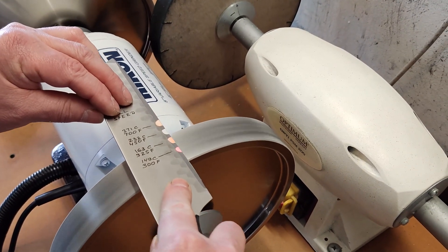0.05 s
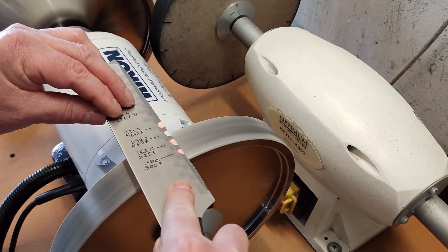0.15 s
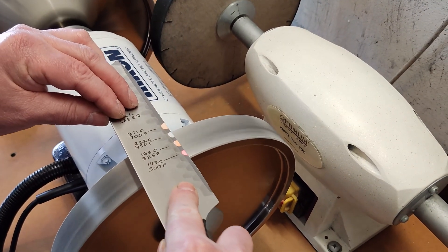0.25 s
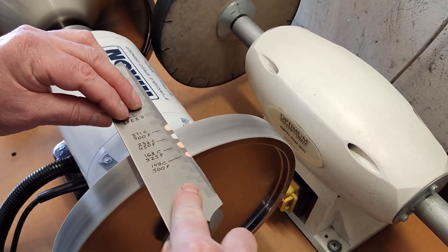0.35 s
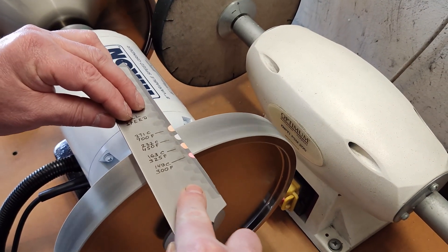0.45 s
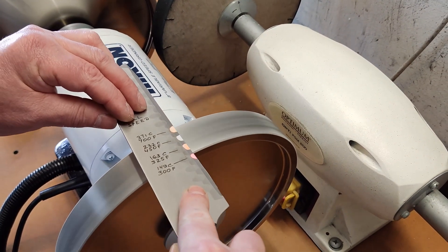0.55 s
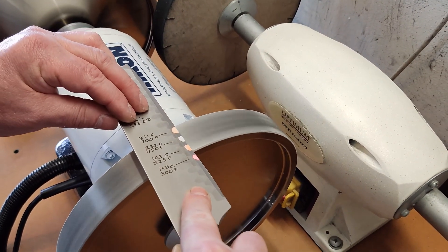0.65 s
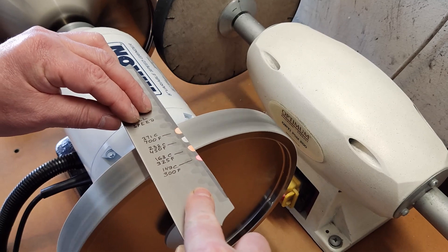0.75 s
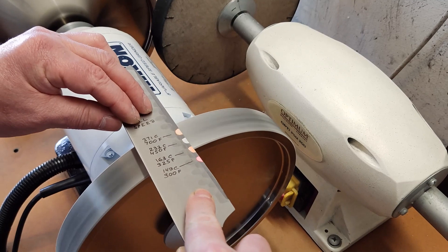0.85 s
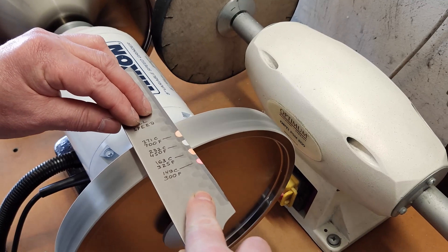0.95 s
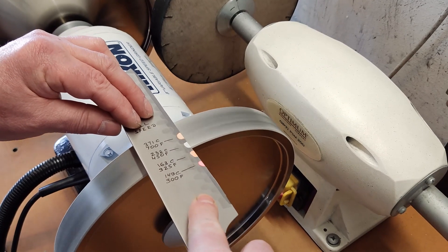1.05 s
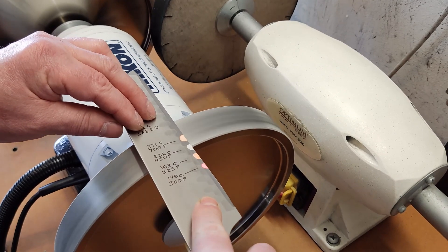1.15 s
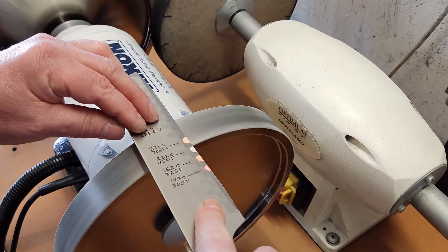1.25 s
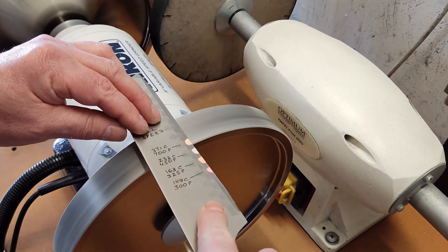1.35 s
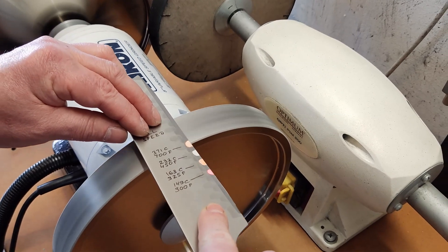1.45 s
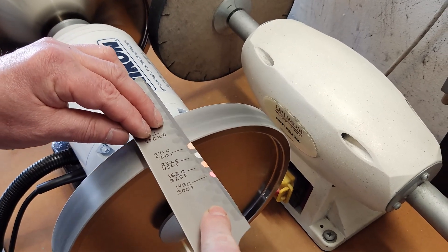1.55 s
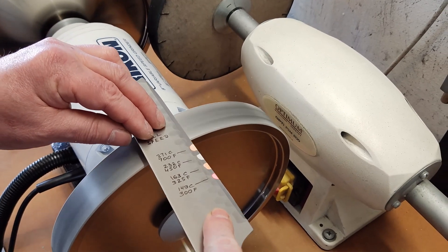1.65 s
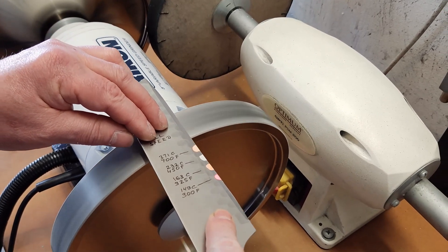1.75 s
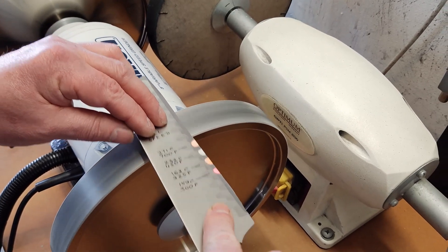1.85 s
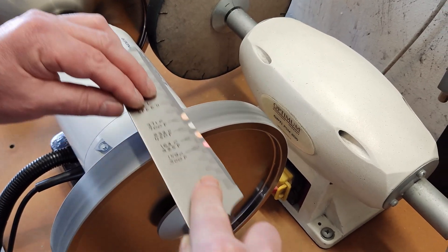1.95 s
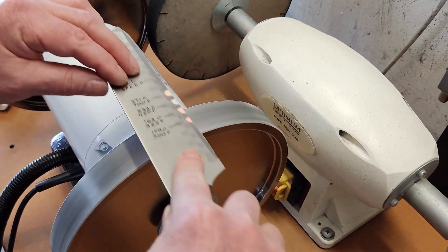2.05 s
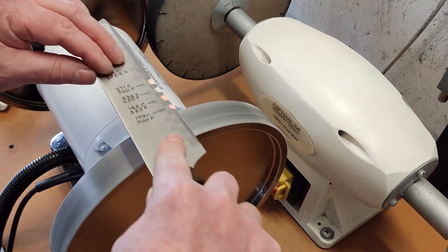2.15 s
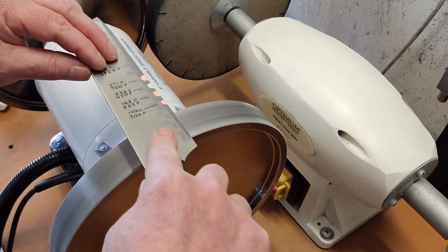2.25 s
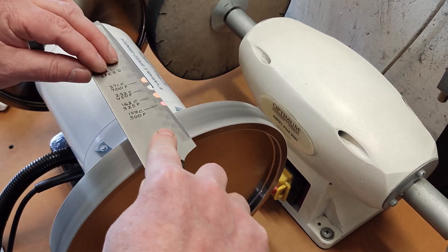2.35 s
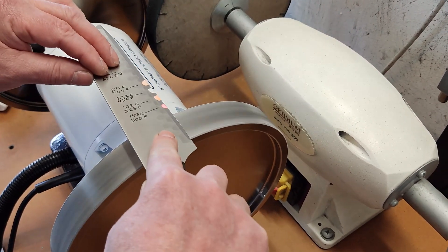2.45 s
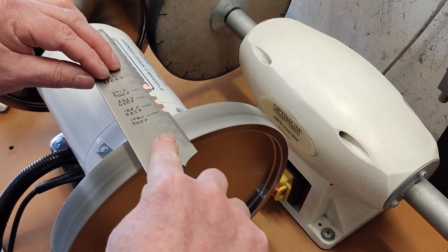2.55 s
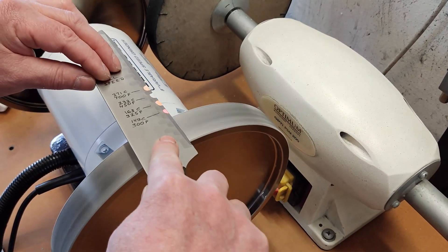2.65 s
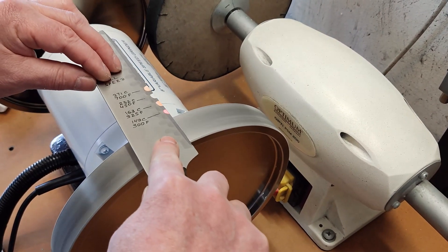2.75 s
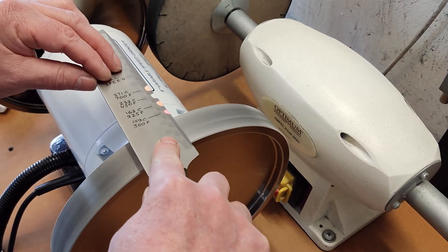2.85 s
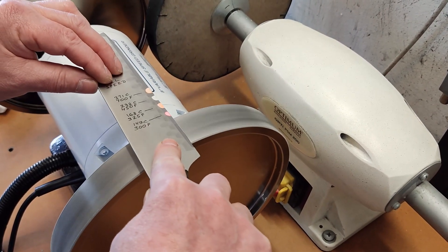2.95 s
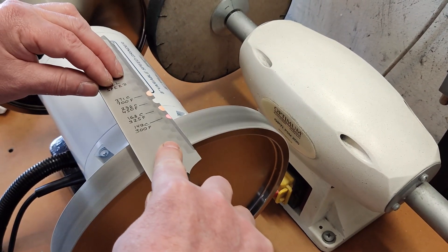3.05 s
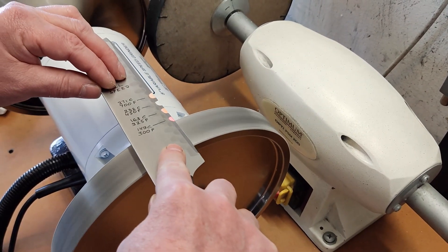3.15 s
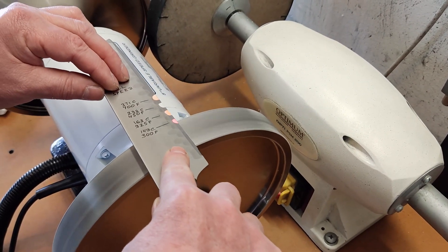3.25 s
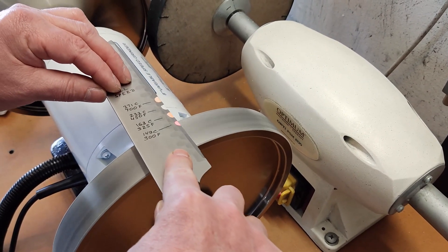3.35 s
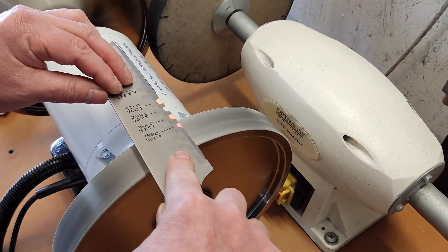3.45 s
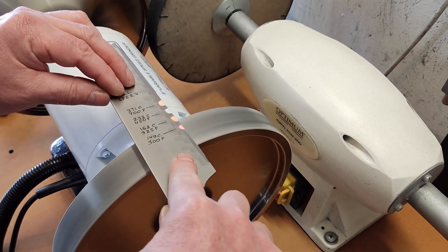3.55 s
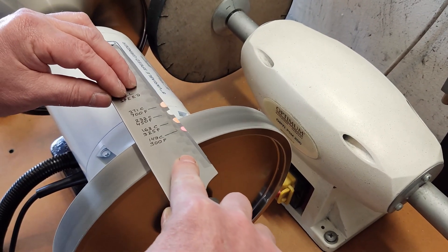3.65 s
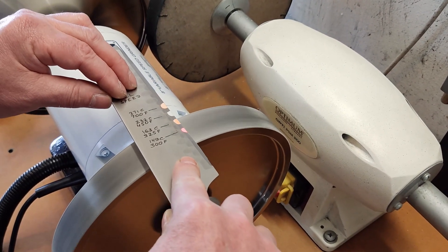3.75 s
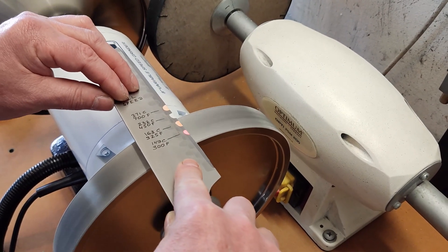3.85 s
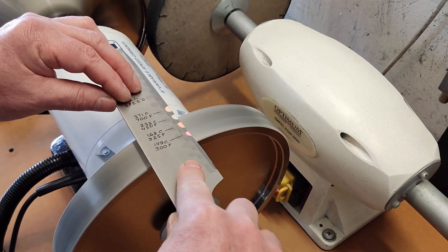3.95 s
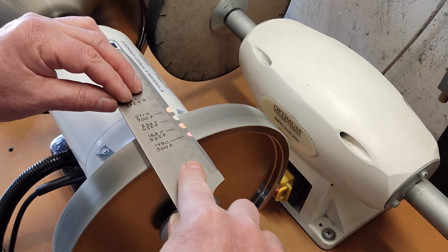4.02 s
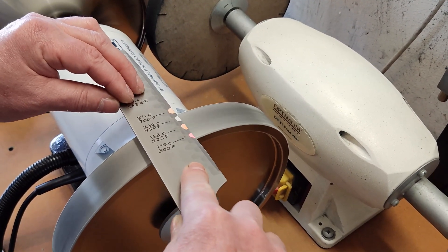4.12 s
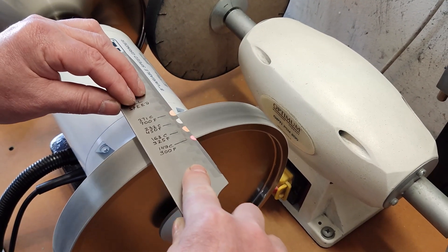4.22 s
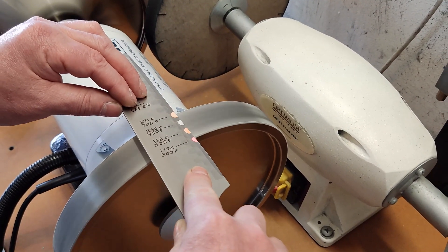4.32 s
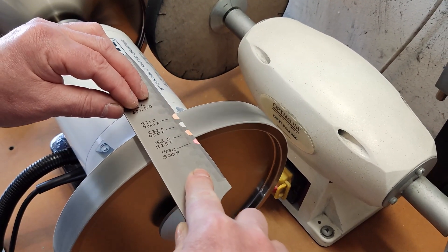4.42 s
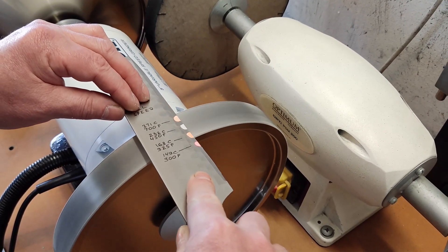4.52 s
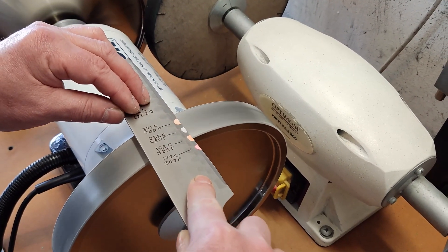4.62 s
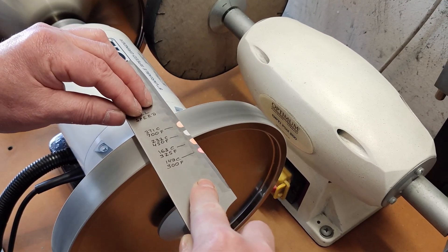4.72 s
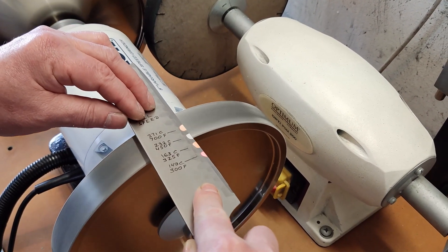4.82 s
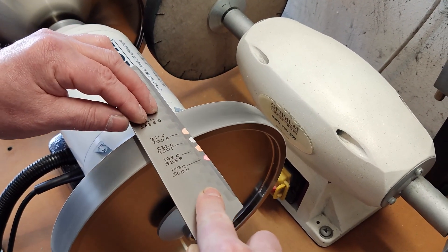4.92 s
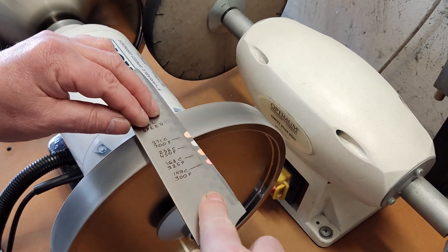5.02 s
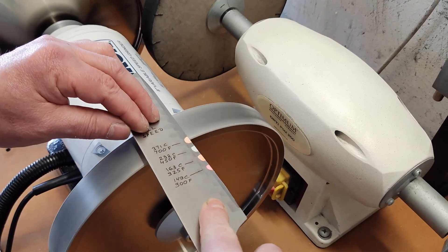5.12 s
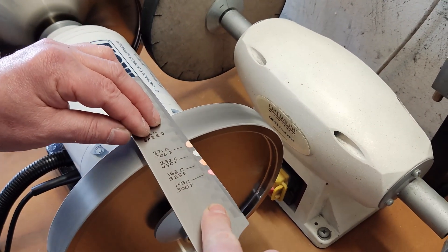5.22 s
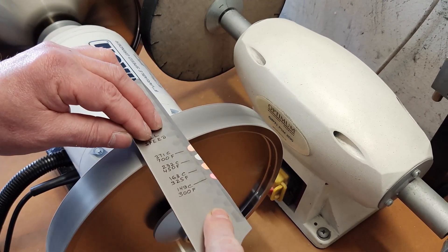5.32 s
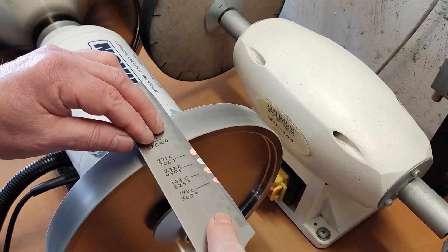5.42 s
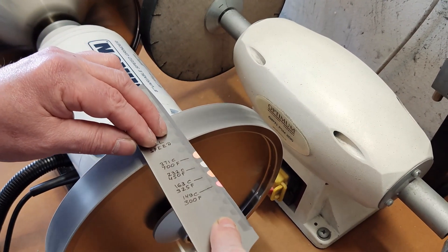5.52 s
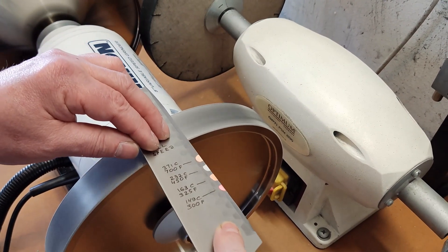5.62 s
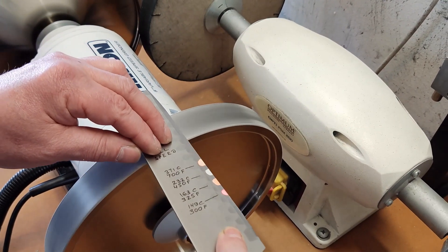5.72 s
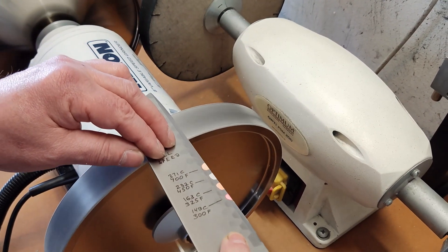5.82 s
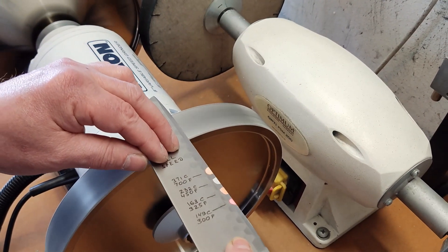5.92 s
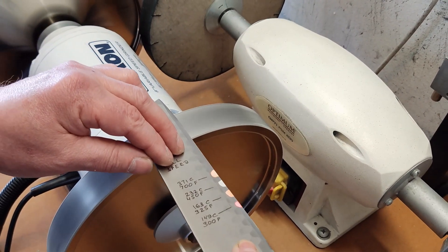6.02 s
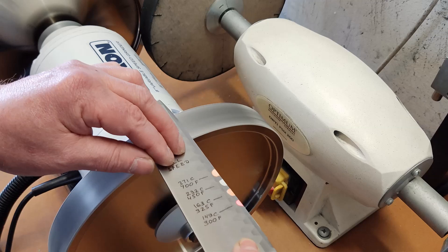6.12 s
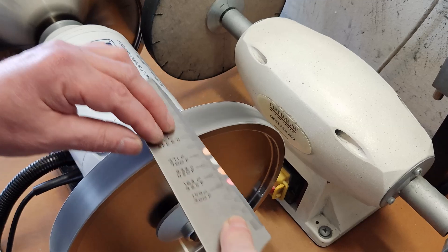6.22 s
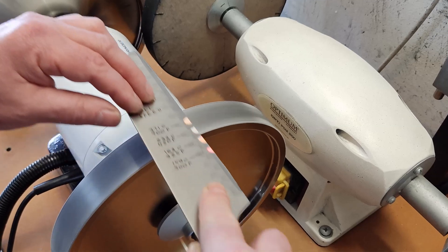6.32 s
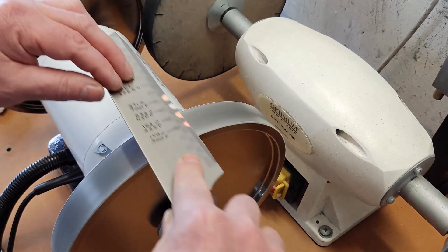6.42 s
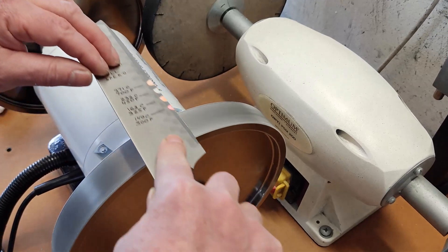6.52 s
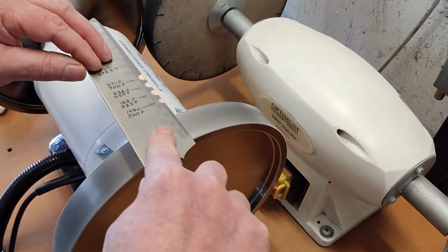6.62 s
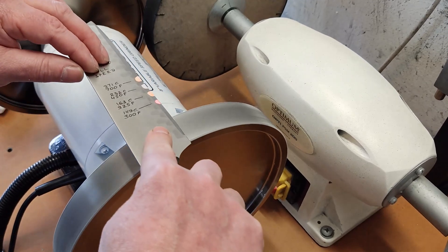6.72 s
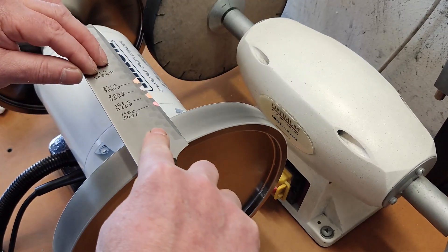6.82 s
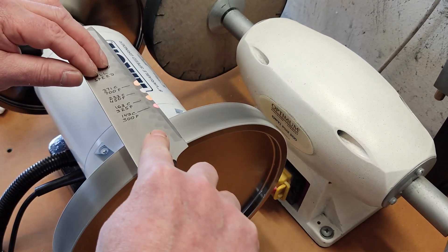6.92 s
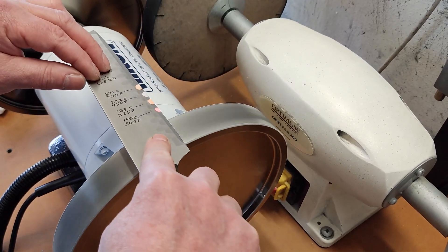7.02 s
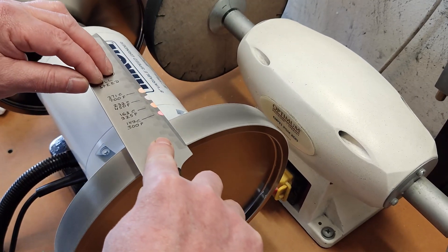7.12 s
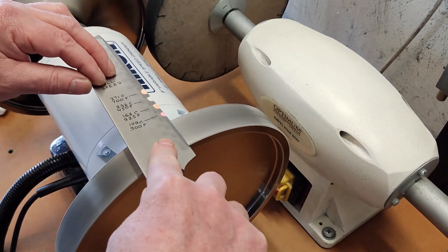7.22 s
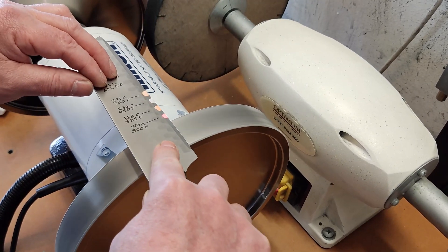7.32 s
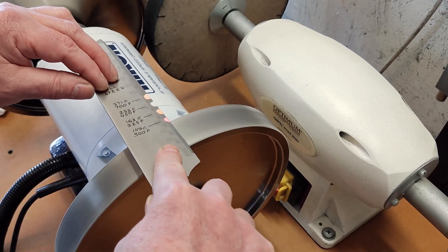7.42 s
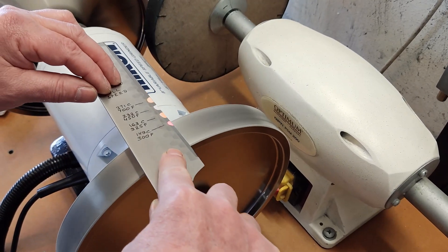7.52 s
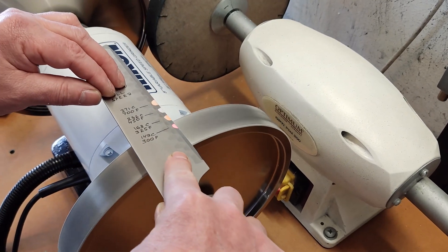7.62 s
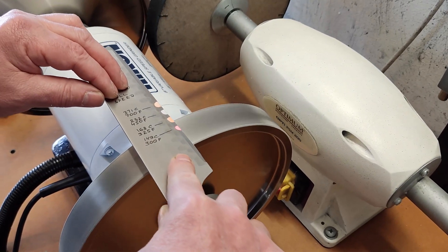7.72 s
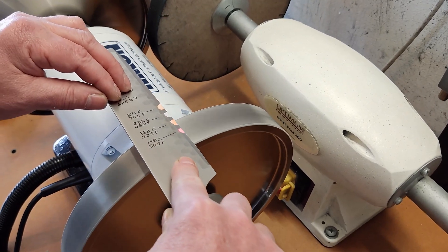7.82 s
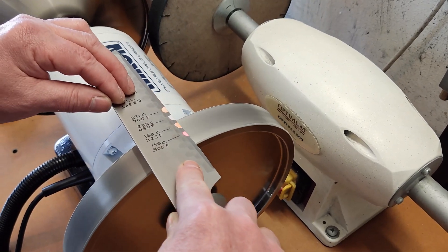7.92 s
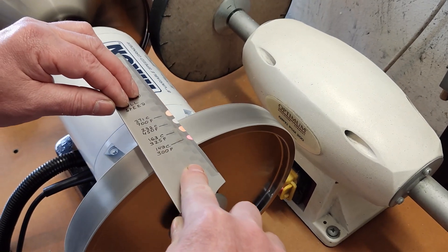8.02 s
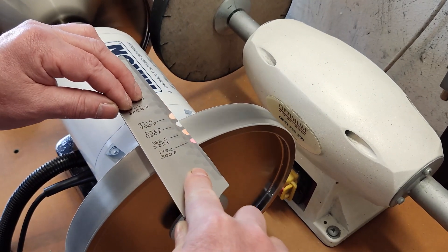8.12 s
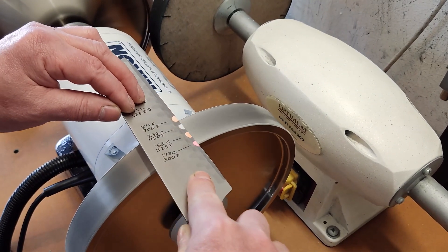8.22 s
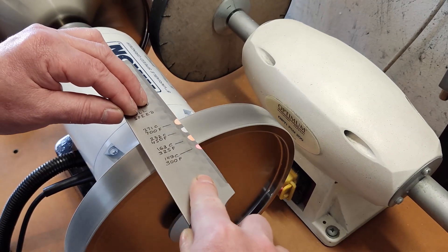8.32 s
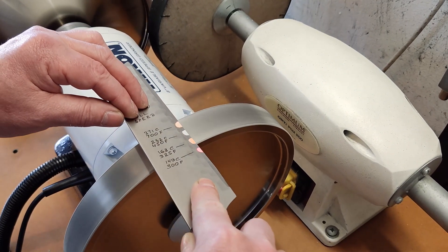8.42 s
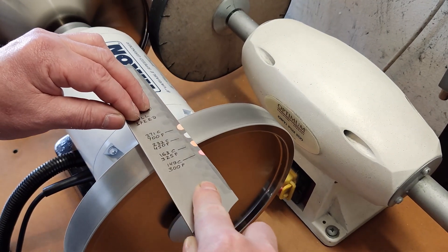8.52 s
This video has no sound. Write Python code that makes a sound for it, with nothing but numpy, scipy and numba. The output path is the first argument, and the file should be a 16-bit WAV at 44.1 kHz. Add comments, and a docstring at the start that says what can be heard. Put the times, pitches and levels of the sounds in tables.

```python
"""A steel blade is drawn three times across a metal grinding wheel on a bench motor, close to a phone.
At the start the first stroke is under way: grit scrapes the blade and the hiss throbs once a turn, while
blade modes glide as the contact moves toward the tip. At each of the two lifts the scrape dies away, a deep
thud follows, the wheel rings on freely and the mains hum stands out. The second and third landings begin
with bright cracks and a deeper throb; the sound ends with the third stroke still on the wheel."""
import sys
import numpy as np
from scipy import signal
from scipy.fft import rfft, irfft, next_fast_len
from scipy.io import wavfile
from scipy.ndimage import uniform_filter1d, map_coordinates
from numba import njit

SR = 44100
rng = np.random.default_rng(int(sys.argv[2]) if len(sys.argv) > 2 else 0)


def wav_record(signal):
    """Record a signal, one row per channel, as 16-bit PCM in the file named by sys.argv[1]."""
    frames = np.transpose(np.atleast_2d(signal))
    bounded = np.clip(frames, -1, 1)
    # unit amplitude maps onto the largest positive 16-bit level
    quanta = np.round(bounded * 32767).astype(np.int16)
    wavfile.write(sys.argv[1], SR, quanta)


N = 377937
TIME = np.arange(N) / SR
TURN_HZ = 48.3  # wheel and shaft
SIDE = np.array([[.5], [-.5]])  # half of each left-right difference goes to either port


# The high spot of the wheel falls behind as load slows it: [t/s, lag/turns, scale of the throb/dB]
LOAD = [(.6, -.13, 3), (1.15, .5, 8), (1.45, 1.15, 13), (1.9, 1.15, 10), (3.1, 1.17, 5), (3.6, 1.45, 3),
        (4.7, 1.5, 5), (6.2, 1.5, 4), (7.2, 1.9, 6), (8.5, 1.92, 7)]
# Bands of the scrape (low, middle, top) against the hiss: at the heel, change up to the tip, extra on landing
HEEL_DB, TIP_DB, BITE_DB = (-16.5, -9, -5), (-11.5, -12.5, 0), (1, 1, 2)
BITE_S = 0.5
BOUNCE_DB, BOUNCE_S = (10, 3), .16  # added to the throb scale after each later landing
# Colour of the scrape between the two ports: [f/Hz, left minus right level/dB]
SCRAPE_PAN = [(100, -1), (600, -3.5), (1200, 2), (2300, 2.5), (3400, 3), (4200, 0), (6500, -1), (8700, -10),
              (10000, -1.5), (11200, 14.5), (13000, 4)]
# Phase difference of the scrape between the ports: [f/Hz, left lead/rad]
SCRAPE_LEAD = [(100, 0), (600, -1.2), (1400, -1.5), (2800, -2.4), (4100, -3.1), (5000, -3.6), (6200, -6.2),
               (14000, -6.3)]
# Coherence of the scrape between the ports: [f/Hz, share of power both ports hear]
SCRAPE_ALIKE = [(700, .75), (2800, .6), (4100, .7), (5600, .5), (7000, .55), (8500, .75), (9700, .75),
                (11200, .45), (13500, .5)]


def grinding():
    """Friction noise: grit excites the blade, and the wheel's eccentricity modulates it once a turn."""
    place, bite = along(first=5, last=6, begins=7), after_landing(BITE_S)
    low_db, mid_db, top_db = (heel + tip * place + extra * bite
                              for heel, tip, extra in zip(HEEL_DB, TIP_DB, BITE_DB))
    # the low scrape follows the wheel's repeating surface most
    fine, coarse = (ports(grit(again), grit(again), grit(again),
                          blade_colour, SCRAPE_PAN, SCRAPE_LEAD, SCRAPE_ALIKE) for again in (.2, .6))
    high = patchy(fine, 5., 60., .3)
    low = patchy(coarse, 7.5, 50., .35)

    low_scrape = undb(low_db + 0.18 * walk(6.5)) * steady(band(low, 656.0, 3750.0))
    mid_scrape = undb(mid_db + 1.0 * walk(9)) * steady(band(low, 2930.0, 5970.0))
    hiss = steady(band(high, 6100.0, 10470.0))
    top_scrape = undb(top_db + 1.5 * walk(9)) * steady(band(high, 10510.0, 14000.0))
    scrape = low_scrape + mid_scrape + steady(hiss + glides(fine, coarse) + top_scrape, .12)

    # the high spot hits suddenly and lets go slowly; its timing wavers
    behind, depth_db = curve(LOAD)
    turn = (TURN_HZ * TIME - behind + .03 * walk(3)) % 1
    pulse = uniform_filter1d(np.exp(-turn / .5), size=170) - .4
    # just after landing the blade bounces, so the throb is deeper
    bounce_db = after_landing(BOUNCE_S, BOUNCE_DB)
    throb_db = (depth_db + bounce_db + 1.4 * walk(5.5)) * pulse + 0.95 * walk(35)

    # the bench rumbles under the pressure
    rumble = undb(-42 + 2.2 * walk(6)) * band(rng.standard_normal(N), 77.0, 267.0)
    return contact() * (scrape * undb(throb_db) + rumble)


# Three strokes along the blade, place 0 = heel and 1 = tip: [landing t/s, start of lift t/s, lift duration/s,
#  scrape gain on landing/dB, scrape gain at lift/dB, place on landing, place at lift,
#  start of the straight run of place t/s, sinking time of hum/s, sunk hum gain/dB, hum gain at lift/dB]
STROKES = [(-.5, 1.85, .11, -13, -15, 0.15, 1, .75, .3, -41, -38.5),
           (2.806, 6.05, 0.19, -14, -13, 0.12, 0.71, 3.87, 0.31, -46.5, -38),
           (7.185, 8.8, .2, -14, -12.5, 0.03, .8, 6.6, 0.14, -50.5, -37.5)]
# The hand eases or presses for a moment: [t/s, width/s, level/dB]
PRESSES = [(.38, 0.087, 1.5), (.57, 0.15, -1.5), (2.82, 0.06, -1.5), (4.25, 0.21, 1.5), (4.449, 0.17, -2),
           (5.379, 0.039, 1.9), (7.7, 0.073, 1), (8.202, 0.067, 1.5)]
LIFT_DB, LIFT_POWER = -24, 1.4  # fall of the scrape over one lift duration, slow at first


def contact():
    """Contact force sets excitation: full at once on landing, dying away through the lift."""
    out = 0
    for (land, lift, lasts, *_), (again, *_) in zip(STROKES, STROKES[1:] + [(np.inf,)]):
        fall_db = LIFT_DB * np.clip((TIME - lift) / lasts, 0, 4) ** LIFT_POWER
        out = out + (TIME > land) * (TIME <= again) * undb(fall_db)
    press_db = sum(db * bump(s, width) for s, width, db in PRESSES)
    return out * undb(along(first=3, last=4, begins=0) + press_db)


def along(first, last, begins):
    """Linear interpolation of a stroke's value up to its lift, from the time in column `begins`."""
    points = [((row[0], row[first]), (row[begins], row[first]), (row[1], row[last])) for row in STROKES]
    return curve(np.vstack(points))[0]


def after_landing(decay_s, sizes=(1, 1)):
    """Exponential relaxation: full size as the blade lands again, dying away."""
    return sum(size * (TIME > row[0]) * np.exp(-np.abs(TIME - row[0]) / decay_s)
               for row, size in zip(STROKES[1:], sizes))


def grit(again):
    """Periodic roughness noise: rough grains, of which a share comes round again on the next turn."""
    turn = int(round(SR / TURN_HZ))
    shape = (N // turn + 1, turn)
    grains = rng.standard_normal(shape) * undb(1.2 * rng.standard_normal(shape))
    # one row is one turn; the filter recurs from row to row
    surface = signal.lfilter([1], [1, -np.clip(again, 0, .97)], grains, axis=0)
    return level(surface.ravel()[:N], 0)


# Broad spectrum of the scrape, relative: [f/Hz, level/dB per Hz]
SCRAPE = [(700, -21.5), (1100, -23.5), (2500, -21.5), (3000, -20.5), (3280, -29.5), (3600, -15),
          (3980, -29), (4400, -12.5), (6500, -11), (7500, 1.5), (8700, 7.5), (10300, 0), (11400, -3.5),
          (12200, -4), (13400, -3), (14300, -21)]
# Modes of steady frequency, of the blade and (near 2.7 and 3 kHz) of the wheel, on the same scale: [f/Hz,
# width/Hz, level/dB]
STEADY_MODES = [(1525, 53, -22.5), (2133, 140.6, -20.5), (4268, 177, -11), (5125, 30, -5), (5412, 38, -10.5),
                (5755, 50, -9), (6760, 110, -7), (8660, 110, -3.5), (2718, 42, -9), (2983, 77, -8.5),
                (3547, 100, -11.5), (6240, 60, -8), (9140, 114, 1), (11110, 190, 2), (11570, 120, -3)]


def blade_colour(hz):
    """Modal response: Lorentzian peaks of the steady modes on the broad scrape spectrum."""
    peaks = sum(undb(db - at(SCRAPE, f)) / (1 + ((hz - f) / (w / 2)) ** 2) for f, w, db in STEADY_MODES)
    return at(SCRAPE, hz) + 20 * np.log10(1 + peaks)


def patchy(x, db, cell_hz, cell_s):
    """Uneven noise: narrow patches of the spectrum swell and fade at random."""
    hz, s, z = signal.stft(x, SR, nperseg=1024)
    grid = rng.standard_normal((int(hz[-1] / cell_hz) + 2, int(s[-1] / cell_s) + 2))
    place = hz[:, None] / cell_hz + 0 * s, s / cell_s + 0 * hz[:, None]
    swell_db = db * map_coordinates(grid, place, order=1, mode="nearest")
    return signal.istft(z * undb(swell_db), SR, nperseg=1024)[1][:, :N]


# Blade modes that ring for a while, most climbing as the free length shortens; level is against the hiss:
# [start t/s, end t/s, start f/Hz, end f/Hz, start level/dB, end level/dB]
GLIDES = [(0, 0.8, 2150, 2165, -23.5, -23), (0.404, 1.145, 1100, 1254, -29.5, -21),
          (1.05, 1.5, 1480, 2150, -26, -28), (1.52, 1.72, 2300, 2950, -27, -22),
          (1.2, 1.42, 4400, 5450, -24, -23), (1.42, 1.9, 5500, 5560, -23, -26),
          (1.1, 1.33, 8850, 9780, -1, 2), (1.33, 1.9, 9780, 10250, 3, -4),
          (1.46, 1.9, 11000, 11800, -3, -5), (1.55, 1.9, 8650, 8850, -9, 0),
          (2.85, 3.87, 1480, 1590, -23, -34), (2.81, 3.06, 11200, 11330, -3.5, -11),
          (3.6, 4.45, 8650, 8650, -13.5, -5), (2.9, 3.75, 4250, 4160, -23, -25),
          (3.5, 4.6, 2090, 2150, -27, -38), (4.39, 5.46, 1200, 1250, -31, -40),
          (5.11, 5.6, 2010, 2040, -34, -27.5), (5.197, 6.153, 8650, 8740, -17.5, -6),
          (7.18, 8.09, 1470, 1750, -25.5, -34), (7.25, 7.8, 2900, 3080, -18, -21),
          (8.0, 8.45, 3510, 3600, -21, -20), (7.19, 7.32, 5800, 5750, -8, -12),
          (8.05, 8.57, 2120, 2280, -28, -26), (7.5, 8.05, 6650, 7300, -10, -15),
          (7.19, 7.7, 11230, 11260, -2, -7), (7.95, 8.3, 8300, 8750, -6, 2)]


def glides(fine, coarse):
    """Moving resonance: the grit drives a band-pass whose centre glides, fading in and out."""
    out = np.zeros((2, N))
    for start, end, from_hz, to_hz, from_db, to_db in GLIDES:
        a, b = max(int((start - .1) * SR), 0), min(int((end + 0.053) * SR), N)
        t = TIME[a:b]
        share = np.clip((t - start) / (end - start), 0, 1)
        hz = from_hz * (to_hz / from_hz) ** share * (1 + 0.0068 * walk(12.6, size=b - a))
        db = from_db + (to_db - from_db) * share + 1.3 * walk(16, size=b - a)
        edge = np.clip(np.minimum((t - start + 0.097) / 0.086, (end + 0.053 - t) / 0.13), 0, 1)
        force = (coarse if from_hz < 6000 else fine)[:, a:b]
        width = 50. + .055 * from_hz  # Hz, of each of two passes
        ring = np.array([svf(svf(c, hz, width), hz, width) for c in force])
        out[:, a:b] += level(ring, 0) * undb(db) * edge
    return out


@njit
def svf(x, hz, width):
    """Second-order resonance: state-variable band-pass with a moving centre, gain 1 there."""
    out, band_state, low_state = np.empty(len(x)), 0., 0.
    for i in range(len(x)):
        g, k = np.tan(np.pi * hz[i] / SR), width / hz[i]
        v = (band_state + g * (x[i] - low_state)) / (1 + g * (g + k))
        band_state = 2 * v - band_state
        low_state += 2 * g * v
        out[i] = k * v
    return out


# The edge strikes the wheel on landing and on the first bounces: [t/s, level/dB]
CRACKS = [(2.807, -15), (2.82, -15), (2.882, -17), (2.901, -12), (7.188, -14), (7.198, -11)]
CRACK_S = .004  # decay


def crack():
    """Impact noise: short bright bursts as the edge meets the wheel."""
    size = sum(undb(db) * (TIME > s) * np.exp(-np.abs(TIME - s) / CRACK_S) for s, db in CRACKS)
    return size * band(rng.standard_normal((2, N)), 6500., 14200.)


# Mode frequencies of the wheel: [f/Hz]
WHEEL_HZ = [2722, 5104, 5486, 7949, 8425, 8753, 11132, 11374, 11698, 11757, 12355, 12581]
# Each wheel mode under the blade, against the hiss: [level/dB]
DRIVEN_DB = [-48, -48, -36, -36, -38, -38, -30, -30, -35, -28, -34, -27]
# Free decay of each wheel mode, levels before the slow swell:
# [t60/s, level after first lift/dB, level after second lift/dB, left minus right level/dB]
WHEEL = [(.5, -52, -55, -3), (1.13, -61, -32.5, -5.5), (0.9, -53.5, -42, 6), (1.2, -28.5, -38, 0),
         (1.1, -48, -33.5, -26), (0.44, -40, -52, -16), (2.18, -24, -23, 17), (0.82, -44, -37, 22),
         (0.7, -33, -43, 18), (1.1, -34, -42, 30), (1.487, -45, -22, -1), (2.3, -34, -20, 10.5)]
RING_FOLLOWS = 0.75  # share of the hum's dB change that the free ringing follows


def wheel_ring():
    """Forced and free vibration: grit drives the modes, which decay exponentially after each lift."""
    out, scrape = 0, contact()
    swell_db = RING_FOLLOWS * (opening() - OPEN_DB)
    for hz, driven_db, (t60, *lift_db, pan_db) in zip(WHEEL_HZ, DRIVEN_DB, WHEEL):
        size = scrape * undb(driven_db + 2.5 * walk(25))
        beat_db = 1.5 * walk(8)
        for (_, lift, lasts, *_), (again, *_), db in zip(STROKES, STROKES[1:], lift_db):
            free = np.clip((TIME - lift) / lasts, 0, 1) * (TIME < again)
            # the decay is counted for one second, then holds
            decay_db = 60 * np.clip(TIME - lift - lasts - RISE_S, 0, 1) / t60
            size = size + free * undb(db + swell_db + beat_db - decay_db)
        # the phase wanders under the blade
        wander = np.tanh(scrape / .03) * 0.89 * walk(22)
        phase = 2 * np.pi * hz * TIME + wander + rng.uniform(0, 2 * np.pi) + SIDE * 0.38
        out = out + size * np.sqrt(2) * np.sin(phase) * undb(SIDE * pan_db)
    return out


# Mains and shaft lines: [f/Hz]
HUM_HZ = [99.9, 148.3, 199.8, 249.7, 299.6, 348.2, 399.6, 499.5, 599.4, 648.4, 799.0, 567.9, 699.3, 748.1,
          898.9, 981.8, 998.6, 1185]
# Balance of those lines, levels relative: [level/dB, left minus right level/dB, left lead/rad]
HUM = [(-55, 3, 11.5), (-50.5, 3, -0.2), (-54.5, 3, -0.5), (-54, -6, 1), (-50, -8, 0.5), (-45, 12.5, -0.5),
       (-33.5, 6.5, 0.5), (-25.5, -1.5, -1.5), (-34.5, -14.5, -3), (-53, 0, 1), (-44, 0, 2), (-51, -2, 1),
       (-43.5, 4.5, 1), (-46, 8, -1), (-43.5, 2, -6), (-47, 11, -1.5), (-46, -6, 0), (-57.5, -16.5, 1)]
# Spectrum of the whir, relative: [f/Hz, level/dB per Hz]
WHIR = [(12, -31), (20, -23), (246, -15), (491, -7), (548, -7), (1010, -15.5), (1400, -26), (5870, -33.5),
        (8700, -25), (11400, -32), (13100, -45), (14600, -101)]
# Coherence of the whir between the ports: [f/Hz, share of power both ports hear]
WHIR_ALIKE = [(100, .75), (1000, 0.33), (10000, 0.44)]
# The motor sound wavers: [t/s, width/s, hum level/dB, thump level/dB]
SWELLS = [(0.99, 0.32, 8.5, -8), (1.7, 0.22, 2.5, 11), (0.2, 0.19, 4.5, -4)]
THUMP_DB, THUMP_FOLLOWS = -41.5, 0.36  # shaft thump between strokes; share of the hum's dB change
SHAKE_DB = (-16, -9)  # gain of the thump's unsteady part, shaft settled and fully loose


def motor():
    """Rotating-machine noise: tonal lines over the broadband whir of air and bearings, a thump each turn."""
    hum_db = opening() + sum(db * bump(s, width) for s, width, db, _ in SWELLS)
    thump_db = THUMP_DB + THUMP_FOLLOWS * (opening() - OPEN_DB)
    thump_db = thump_db + sum(db * bump(s, width) for s, width, _, db in SWELLS)
    hum = 0
    for hz, (db, pan_db, lead) in zip(HUM_HZ, HUM):
        phase = 2 * np.pi * hz * TIME + rng.uniform(0, 2 * np.pi) + SIDE * lead
        hum = hum + undb(db + 1.16 * walk(7.2) + SIDE * pan_db) * np.sin(phase)
    whir = ports(grit(0.25), grit(0.42), grit(0.21),
                 lambda hz: at(WHIR, hz), SCRAPE_PAN, SCRAPE_LEAD, WHIR_ALIKE)

    # the blade unsettles the shaft
    loose = np.clip(.25 + contact() / .2, 0, 1)
    shake = band(rng.standard_normal(N), 30., 55.) + 1.4 * band(rng.standard_normal((2, N)), 20., 52.)
    shake_db = SHAKE_DB[0] + (SHAKE_DB[1] - SHAKE_DB[0]) * loose
    turning = np.sin(2 * np.pi * TURN_HZ * TIME + loose * .35 * walk(5))
    thump = undb(loose * 3.0 * walk(6)) * turning + undb(shake_db) * shake
    steady_sound = level(hum, 1.5) + level(whir, -8)
    return undb(hum_db) * steady_sound + undb(thump_db - SIDE * 4.0) * level(thump, 0)


# Hum and ringing come up after a lift and sag slowly; OPEN_DB is a gain
OPEN_DB, RISE_S, SAG_DB_PER_S = -22, 0.076, 6


def opening():
    """Piecewise-linear gain of the hum in dB: low under the blade, high between strokes."""
    rows = []
    for (land, lift, lasts, *_, sink, sunk_db, lift_db), (again, *_) in zip(STROKES,
                                                                         STROKES[1:] + [(np.inf,)]):
        up = lift + lasts + 0.76 * RISE_S
        rows += [(land + sink, sunk_db), (up - RISE_S, lift_db),
                 (up, OPEN_DB), (again, OPEN_DB - SAG_DB_PER_S * (again - up))]
    return curve(rows[:-1])[0]


THUD_DB, THUD_S = -26, 0.098  # level at the peak, time from lift's end to peak


def thud():
    """Unloading transient: a very low, short shudder as the blade comes off."""
    since = [np.clip(TIME - lift - lasts, 0, 9) / THUD_S for _, lift, lasts, *_ in STROKES[:-1]]
    swell = sum(u * np.exp(1 - u) for u in since)
    return undb(THUD_DB) * swell * band(rng.standard_normal(N), 5., 17.)


def ports(near, left, right, colour_db, pan, lead, alike):
    """Partial coherence: two microphone ports share a sound with a phase lead, plus what each hears alone."""
    size = next_fast_len(N)
    hz = np.arange(size // 2 + 1) * SR / size
    alike = np.clip(at(alike, hz), 0, 1)
    shared = np.sqrt(alike) * rfft(near, size) * np.exp(1j * SIDE * at(lead, hz))
    alone = np.sqrt(1 - alike) * rfft([left, right], size)
    return irfft((shared + alone) * undb(colour_db(hz) + SIDE * at(pan, hz)), size)[:, :N]


def band(x, lo_hz, hi_hz):
    """Band limitation: Butterworth band-pass, brought to unit RMS."""
    sos = signal.butter(4, [lo_hz, hi_hz], "band", fs=SR, output="sos")
    return level(signal.sosfilt(sos, x), 0)


def steady(x, span_s=.33):
    """Short-time normalisation: unit RMS over every span."""
    return x / np.sqrt(uniform_filter1d(np.mean(x ** 2, axis=0), int(span_s * SR)) + 1e-12)


def walk(rate, size=N):
    """Slow random modulation: levels held 1 / rate s and smoothed twice; spread near 1."""
    k = int(SR / rate)
    held = np.repeat(rng.standard_normal(size // k + 1), k)
    return 1.69 * uniform_filter1d(uniform_filter1d(held, k), k)[:size]


def bump(s, width):
    """Gaussian envelope: a smooth rise and fall around s."""
    return np.exp(-((TIME - s) / width) ** 2)


def curve(rows):
    """Linear interpolation of (t/s, value, ..) rows at every sample."""
    s, *columns = np.transpose(rows)
    return [np.interp(TIME, s, c) for c in columns]


def at(table, hz):
    """Log-frequency interpolation of (f/Hz, value) points."""
    f, v = np.transpose(table)
    return np.interp(np.log(hz + 1), np.log(f + 1), v)


def undb(db):
    """Amplitude ratio of a level in dB."""
    return 10 ** (np.asarray(db) / 20)


def level(x, db):
    """RMS normalisation to a level in dB."""
    return x * undb(db) / np.sqrt(np.mean(x ** 2))


def scene():
    """Superposition of all sources."""
    return grinding() + crack() + wheel_ring() + motor() + thud()


TOP_HZ = 14300


def record(dry):
    """Saturation and band limit: the loudest peaks are rounded off, then a steep cut at the top."""
    cut = signal.ellip(10, .2, 75, TOP_HZ, fs=SR, output="sos")
    size = np.abs(dry)
    round_off = np.where(size > .6, .6 + .25 * np.tanh((size - .6) / .25), size)
    return np.clip(signal.sosfilt(cut, np.sign(dry) * round_off), -1, 1)


dry = scene()
out = record(dry)
wav_record(out)
```